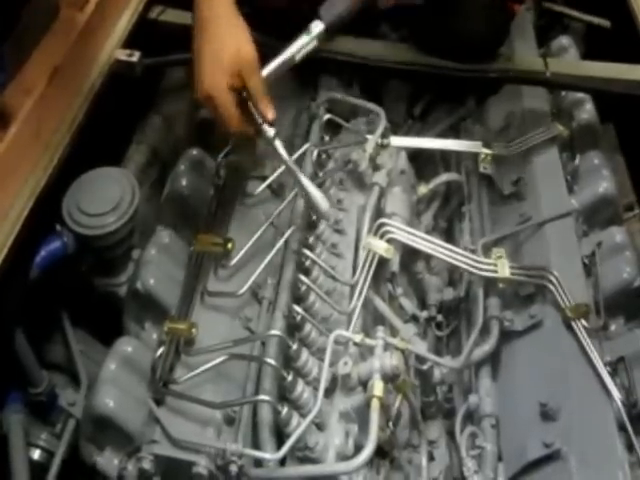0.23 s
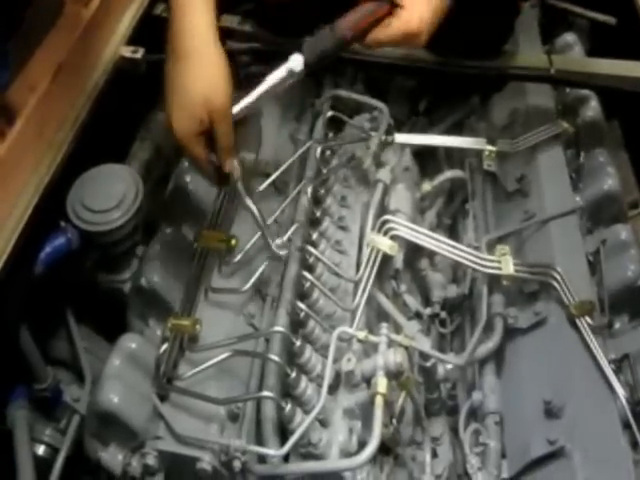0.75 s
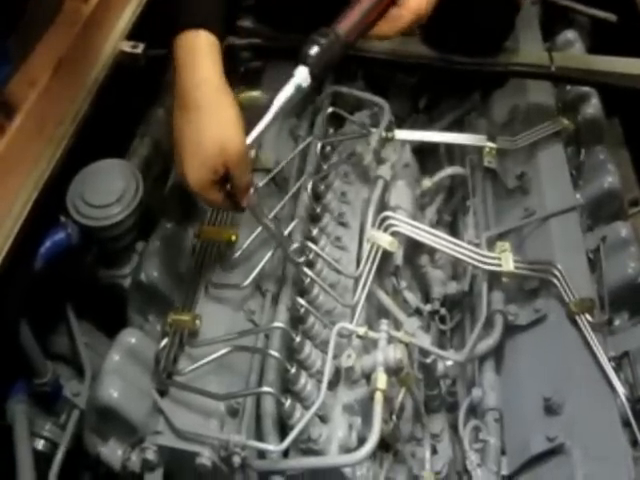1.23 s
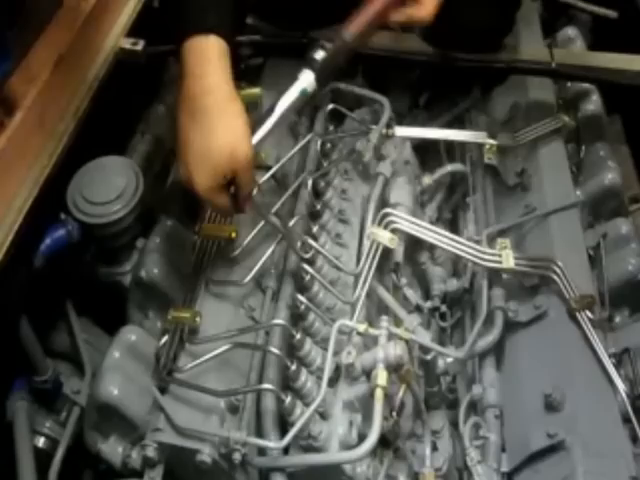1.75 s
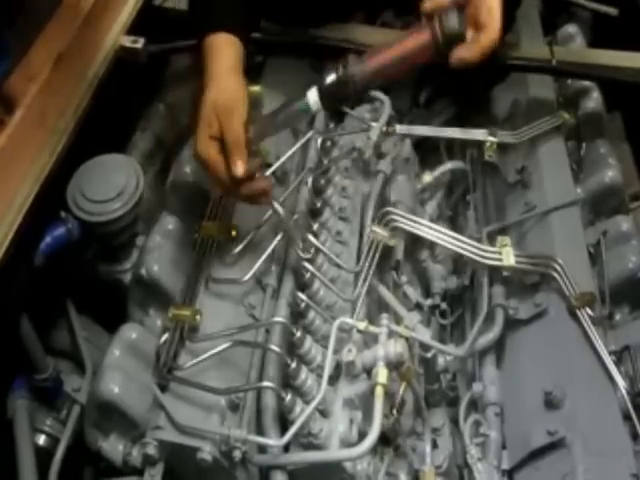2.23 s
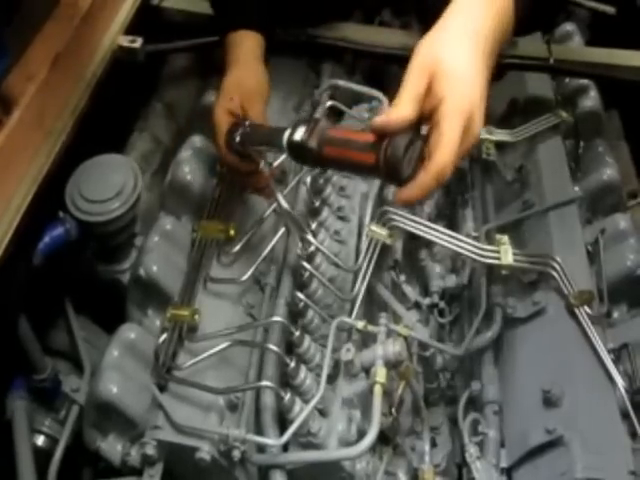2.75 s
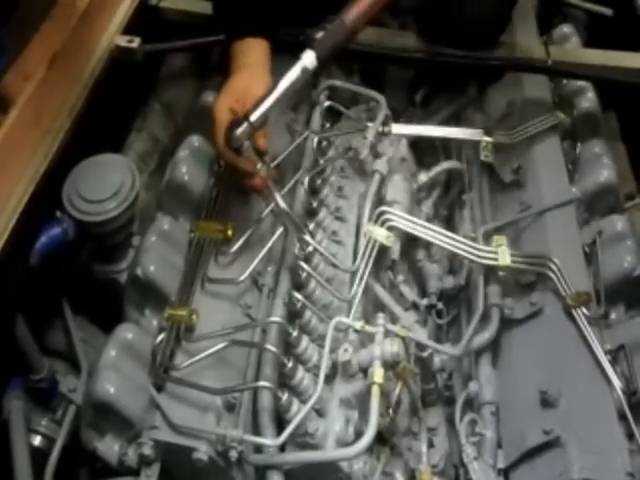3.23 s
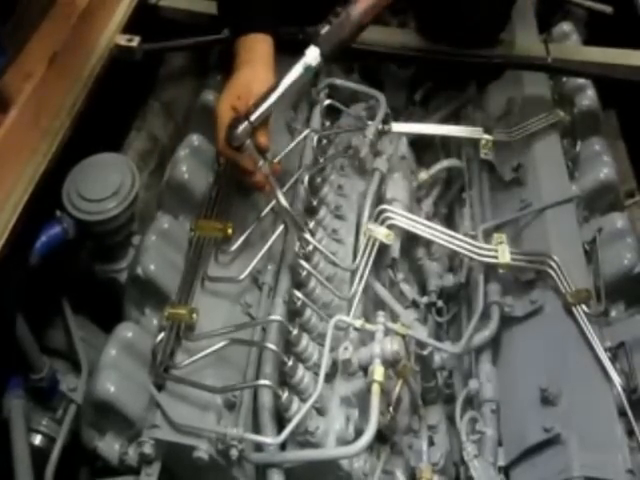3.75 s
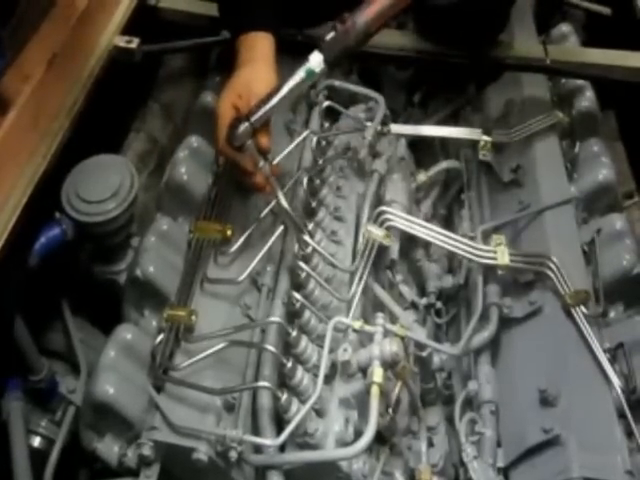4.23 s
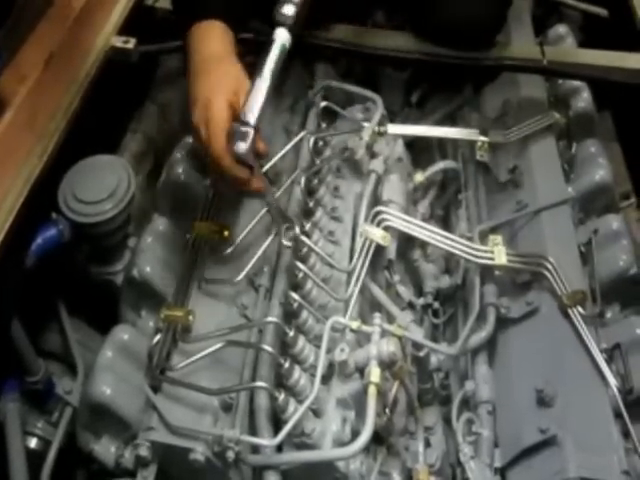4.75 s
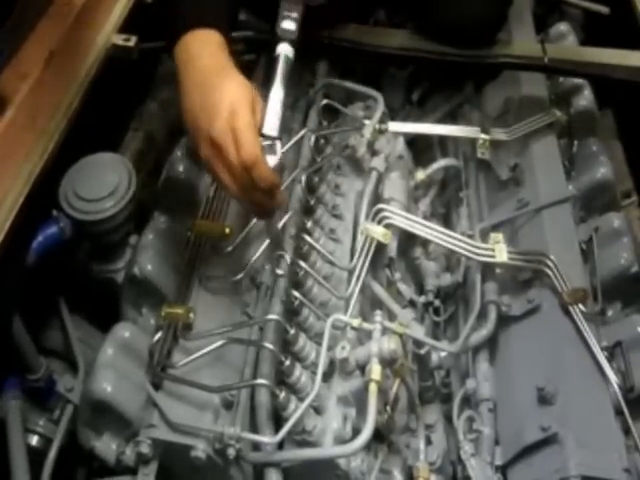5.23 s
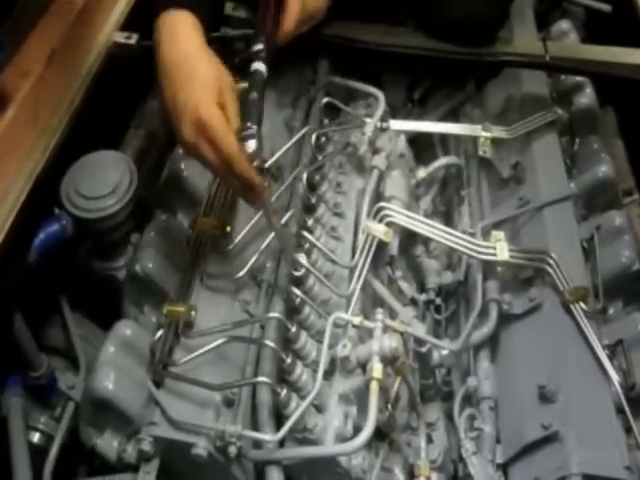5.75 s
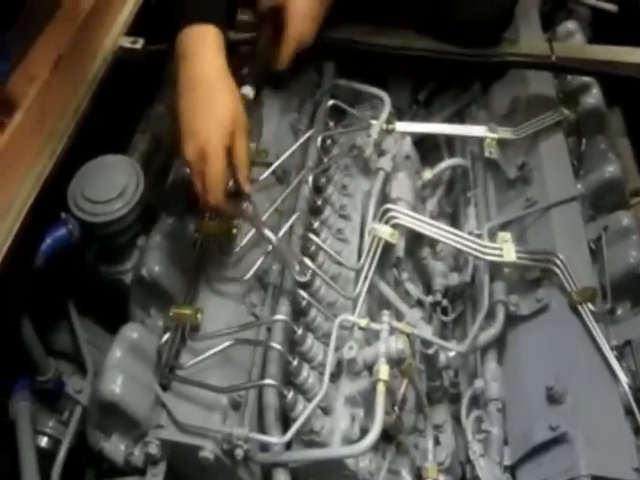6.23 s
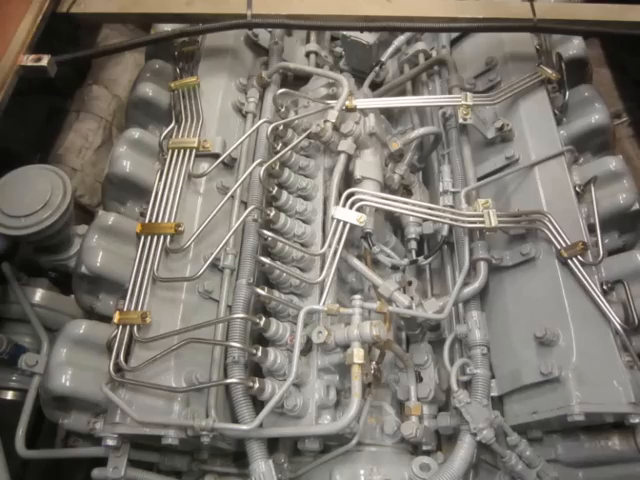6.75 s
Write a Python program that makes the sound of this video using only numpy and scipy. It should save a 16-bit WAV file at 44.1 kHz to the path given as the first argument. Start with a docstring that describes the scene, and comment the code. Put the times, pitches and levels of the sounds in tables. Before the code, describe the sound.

A close, dry workshop with a low wavering machinery hum and faint hiss throughout. After tiny ticks, a ratchet zips at 0.3-0.5 s, about twenty bright metallic clicks speeding up and then braking. Steel knocks follow at 0.8-1.05, and a hard clank with dull pump and pipe ring at 1.5. Around 1.75-1.95 come four slower, softer clicks among knocks and a gritty slide. Mostly hum until 3.0, when a second quick zip of fourteen clicks runs to 3.3, with a scrape and faint thread rub. A soft low drone sinks in pitch towards 4.1. Very hard cracks strike at 4.07 and 4.35, another at 4.5, a lighter one at 4.76; the hum briefly ducks. Small slides and knocks at 4.9-5.5 lead to a clattering cluster at 5.63-5.7. Light ticks and a last knock at 6.06, then abrupt silence from 6.27 to the end.

```python
"""A workshop: a ratcheting torque wrench works on the pipe fittings of a diesel injection pump.
Its pawl zips over the teeth in a quick back-swing, a short slow one and another quick one, each tooth
a burst of noise plus ringing modes. The long steel adapter clanks on nuts and rings, with noise cracks
and decaying modes; the pump and pipes answer dully. Slides, rubs and brushes are shaped noise.
Noise and drones hum underneath; everything ducks after the hardest blows, then stops short."""
import sys
import numpy as np
from scipy import signal
from scipy.fft import rfft, irfft, next_fast_len
from scipy.io import wavfile
from scipy.ndimage import uniform_filter1d

SR = 44100
rng = np.random.default_rng(int(sys.argv[2]) if len(sys.argv) > 2 else 0)


def store_wav(level_fs):
    """Save 16-bit WAV to argv[1]."""
    pcm = np.round(np.clip(np.atleast_2d(level_fs), -1, 1) * 32767)
    wavfile.write(sys.argv[1], SR, pcm.T.astype(np.int16))


N = 308696
TIME = np.arange(N) / SR   # s


def from_db(db):
    """Decibels to gain."""
    return 10 ** (np.asarray(db) / 20)


def rms_one(x):
    """Scale to unit rms."""
    return x / np.sqrt(np.mean(x ** 2) + 1e-20)


def at_hz(points, hz):
    """Read a table on a log-frequency axis."""
    table_hz, value = np.transpose(points)
    return np.interp(np.log(hz + 1), np.log(table_hz), value)


def fade(t, t60):
    """Free decay, 60 dB in t60 seconds."""
    return np.exp(-np.log(1000) * t / t60)


def smooth(x, seconds):
    """One-pole lag."""
    r = np.exp(-1 / (seconds * SR))
    return signal.lfilter([1 - r], [1, -r], x)


def add(out, s, sound):
    """Mix a sound in at time s."""
    i = int(s * SR)
    out[i:i + len(sound)] += sound[:N - i]


def swells(events):
    """Sum of bell-shaped swells: (centre [s], half-width to 1/e [s], level [dB])."""
    return sum(from_db(db) * np.exp(-((TIME - s) / length) ** 2) for s, length, db in events)


def colour(x, *spectra):
    """Causal (minimum-phase) filter whose gain is the sum of the dB spectra."""
    size = 2 * next_fast_len(len(x) // 2 + 2048)
    hz = np.arange(size // 2 + 1) * SR / size
    gain_db = sum(at_hz(spectrum, hz) for spectrum in spectra)
    # folding the cepstrum onto positive time gives minimum phase
    cepstrum = irfft(np.log(from_db(gain_db)))
    cepstrum[1:size // 2] *= 2
    cepstrum[size // 2 + 1:] = 0
    response = np.exp(rfft(cepstrum))
    return irfft(rfft(x, size) * response)[:len(x)]


def narrow_noise(hz, width):
    """Noise held in one narrow resonance; rms 1."""
    b, a = signal.iirpeak(hz, hz / width, fs=SR)
    noise = rng.standard_normal(N + SR)
    resonant = signal.lfilter(b, a, signal.lfilter(b, a, noise))
    return rms_one(resonant[SR:])   # drop the first second, while it builds up


def clatter(t60, linger_db, linger_t60, strike_db=-3, strike_t60=0.0075):
    """Countless crowded steel modes: a sharp strike, a crack that dies fast, then a weak lingering ring."""
    t = TIME[:SR // 4]
    grain = rng.standard_normal(len(t))
    grain /= np.sqrt(uniform_filter1d(grain ** 2, size=32))   # even out the short-term level
    strike = from_db(strike_db) * fade(t, strike_t60)
    linger = from_db(linger_db) * fade(t, linger_t60)
    return grain * (strike + fade(t, t60) + linger)


def ring(modes, spread_db):
    """One blow on a set of decaying modes, each struck with a strength and sign of its own."""
    t = TIME[:SR // 3]
    hz, db, t60 = np.transpose(modes)[:, :, None]
    strength = from_db(db + spread_db * rng.standard_normal(hz.shape)) * rng.choice([-1, 1], hz.shape)
    return np.sum(strength * np.sin(2 * np.pi * hz * t) * fade(t, t60), axis=0)


# colour of the pawl's snap on a tooth: (frequency [Hz], level [dB])
PAWL_COLOUR = [(300, -26.5), (800, -17.5), (1400, -11.5), (2200, -7), (3200, -4), (4300, 0), (5800, 0.5),
               (7000, -2.5), (8400, -1.5), (9800, -5), (11500, -5), (12500, -13)]
# modes of the wrench: (frequency [Hz], relative level [dB], t60 [s])
RATCHET_HEAD = [(4550, -20, .045), (4850, -29.5, .045), (5500, -14, .045), (5500, -16, 0.049),
                (6250, -12, .045), (5830, -26, .045)]
WRENCH_SHAFT = [(2026, -33, 0.04), (2260, -26.5, 0.065), (3980, -26, 0.045), (8360, -47.5, 0.016)]
TOOTH_COLOUR_DB = 2.5   # no two teeth sound quite alike


def ratchet(snap_db=-4.0, head_db=-1.0, shaft_db=-1):
    """The sprung pawl lands on each next tooth and rings the head and shaft of the wrench."""
    snaps, rings = np.zeros((2, N))
    for s, db, treble_db, head_ring_db, shaft_ring_db in teeth():
        snap = clatter(t60=0.038, linger_db=-22.5, linger_t60=.09, strike_db=-1.5, strike_t60=0.009)
        tooth = [(hz, TOOTH_COLOUR_DB * rng.standard_normal()) for hz, _ in PAWL_COLOUR]
        treble = [(5500, 0), (8500, treble_db)]
        add(snaps, s, from_db(db + snap_db) * colour(snap, PAWL_COLOUR, tooth, treble))
        add(rings, s, from_db(db + head_db + head_ring_db) * ring(RATCHET_HEAD, spread_db=2.0))
        add(rings, s, from_db(db + shaft_db + shaft_ring_db) * ring(WRENCH_SHAFT, spread_db=7.0))
    return workshop(snaps, wet_db=-13.0, build_s=0.0071) + rings


# back-swings of the wrench: (start [s], teeth passed [count], rate at the start [teeth/s],
# rate before braking [teeth/s], rate at the end [teeth/s], relative level [dB], treble [dB],
# head ring [dB], shaft ring [dB])
SWINGS = [(0.3131, 20, 77.3, 135.5, 36.3, -4.6, -1, 0.5, -1), (1.8029, 4, 35.7, 33.3, 24.4, -9, -4, -5, -2),
          (3.0276, 14, 46.7, 77.4, 35.0, -3, 0, -9, -2)]
BRAKING_AT = 0.78   # share of a swing after which the hand slows
LOUDER_DB_PER_DOUBLING, BRIGHTER_DB_PER_DOUBLING = 2.3, 4.5   # a faster pawl lands harder
SPRING_ONLY_DOUBLINGS = -0.77   # below this speed (against the swing's mean) the spring alone sets the blow
HEAD_SWELL_DB, SHAFT_RISE_DB = 9, 6   # the head rings most in mid-swing, the shaft towards the end
PRESS_DB = 1   # the hand bears down more towards the end of a swing
TOOTH_SPREAD_DB = 1.6   # random spread of the blows


def teeth():
    """The hand's speed times each drop of the pawl: (s, dB, treble dB, head dB, shaft dB)."""
    for start, count, first, before_braking, last, db, treble_db, head_db, shaft_db in SWINGS:
        along = np.linspace(0, 1, int(round(count)) - 1)
        rate = np.interp(along, [0, BRAKING_AT, 1], [first, before_braking, last])
        times = start + np.r_[0, np.cumsum(1 / rate)]
        doublings = np.log2(np.r_[rate[0], rate] / rate.mean())
        doublings = np.maximum(doublings, SPRING_ONLY_DOUBLINGS)
        along = np.r_[0, along]
        strength_db = db + LOUDER_DB_PER_DOUBLING * doublings + PRESS_DB * (along - .5)
        strength_db += TOOTH_SPREAD_DB * rng.standard_normal(len(times))
        brightness_db = treble_db + BRIGHTER_DB_PER_DOUBLING * doublings
        head_ring_db = head_db + HEAD_SWELL_DB * (np.sin(np.pi * along) ** 2 - .5)
        shaft_ring_db = shaft_db + SHAFT_RISE_DB * (along - .5)
        yield from zip(times, strength_db, brightness_db, head_ring_db, shaft_ring_db)


# steel knocking on steel: (time [s], relative level [dB], low range [dB], top range [dB], crack t60 [s],
# adapter ring [dB], main resonance [Hz], pump body and pipes [dB])
KNOCKS = [(0.8133, -1, 3.5, 0, 0.092, -14, 7000, -4), (0.932, -12, -3, -4, 0.1, -14, 3360, 0.5),
          (0.9584, -10.5, 6.5, -17, 0.12, -36, 2070, -4), (1.0329, 4, -16.5, -10.5, 0.047, -38, 5800, -8.5),
          (1.5153, -7, 3, -13.5, 0.16, -24, 1940, 7.5), (1.5274, 10, -5, -8.5, 0.043, -25.5, 5550, -10),
          (1.5438, -1, 6, -15.5, 0.068, -23, 3840, 5), (1.5765, -4.5, 3, -10, 0.039, -29, 3920, 3.5),
          (1.7552, -2.5, -2.5, 0.5, 0.05, -17.5, 3830, 9), (1.7616, -7, 6.5, -14, 0.059, -36, 1740, -4),
          (1.9389, -7, -20, -1.5, 0.028, -43, 3600, -1.5),
          (1.9451, -2.5, -4.5, -14.5, 0.064, -41, 3170, 0.5), (2.992, -6.5, -13, -48, 0.025, -49, 1920, -3),
          (3.092, -3, -4.5, -15, 0.046, -39, 2940, -11), (3.3388, -9.5, -15.5, 1, 0.083, -44, 5300, -15),
          (3.3473, -2, 0, -0.5, 0.038, -54, 5700, -17), (4.0744, 12, -7.5, 4.5, 0.042, -38, 1070, -21),
          (4.081, -2.5, -10, -5, 0.16, -39, 5600, -14), (4.348, 8.5, 2, 6, 0.038, -36, 1425, -11),
          (4.5247, 3, 2, -4.5, 0.04, -21, 1657, 4), (4.538, -12.5, 2, -16.5, 0.073, -27, 1800, 12),
          (4.761, -6, -10, -6, 0.097, -26, 3760, 7.5), (5.2037, 0.5, -0.5, -8, 0.05, -24, 3610, -0.5),
          (5.2992, -13, 6.5, -3, 0.15, -33, 890, -2.5), (5.4605, -8, 0, -4, 0.095, -15, 1750, 9),
          (5.4868, -8.5, 12, -7, 0.039, -30, 3560, -0.5), (5.6263, -11, 3, -14.5, 0.11, -29.5, 3570, 6),
          (5.634, -12, 3.5, -19.5, 0.12, -21.5, 3140, 7.5),
          (5.6544, 6.5, -4.5, -10.5, 0.05, -19.5, 7370, -0.5),
          (5.664, 2, -4.5, -1.5, 0.025, -32.5, 7500, -5.5), (5.6882, -1.5, 1.5, -7, 0.038, -26, 1032, 3.5),
          (6.0614, -1.5, -8, -14, 0.034, -50, 4570, -11.5)]
# centres of the low, middle, reference and top ranges: (frequency [Hz])
RANGE_HZ = [600, 1900, 4400, 9000]
# colour shared by the knocks: (frequency [Hz], level [dB])
KNOCK_COLOUR = [(120, -19.5), (250, -14), (400, -4.5), (800, -10.5), (1400, -4), (3000, 0), (5500, -2),
                (8000, -3.5), (9500, -6.5), (11500, -8.5), (12500, -7)]
# modes of the long steel adapter and the pipes: (frequency [Hz], relative level [dB], t60 [s])
ADAPTER = [(1830, -18, 0.079), (2880, 1, 0.055), (3473, -17.5, 0.073), (7390, 2.5, 0.052),
           (8260, 6.5, 0.049), (11200, -13.5, .1)]
PIPES = [(408.8, -28, 0.27), (566, -30.5, 0.32), (1030, -43, 0.086), (1100, -35.5, 0.083), (1720, -42, .12),
         (2320, -29.5, 0.097)]
MIDDLE_DB, MIDDLE_FOLLOWS = -1.97, 0.15   # the middle range takes this share of a knock's low range


def knocks(crack_db=-2, body_db=-11.0, pipes_db=-2, main_db=-12.0, main_t60=0.039):
    """Where the steel meets sets each knock's colour and main resonance; adapter and pipes ring on."""
    cracks, rings = np.zeros((2, N))
    for s, db, low_db, top_db, t60, ring_db, hz, pump_db in KNOCKS:
        middle_db = MIDDLE_DB + MIDDLE_FOLLOWS * low_db
        ranges = list(zip(RANGE_HZ, (low_db, middle_db, 0, top_db)))
        crack = clatter(t60, linger_db=-37.0, linger_t60=0.2)
        add(cracks, s, from_db(db + crack_db) * colour(crack, KNOCK_COLOUR, ranges))
        add(rings, s, from_db(db) * ring([(hz, main_db, main_t60)], spread_db=6.0))
        add(rings, s, from_db(db + ring_db) * ring(ADAPTER, spread_db=2.7))
        # the blow shakes the pump and its pipes
        add(rings, s, from_db(db + pump_db + body_db) * body())
        add(rings, s, from_db(db + pump_db + pipes_db) * ring(PIPES, spread_db=2.0))
    return workshop(cracks, wet_db=-16.0, build_s=0.0017) + rings


# dull body of the pump under a knock: (frequency [Hz], level [dB])
BODY_COLOUR = [(200, -24.5), (380, -7.5), (600, 0.5), (850, 1), (1200, 1.5), (1800, 4.5), (3000, -11),
               (6000, -32.5)]


def body(t60=0.11, build_s=0.009):
    """The heavy pump takes a moment to answer a blow, and rings dully."""
    t = TIME[:SR // 4]
    answer = fade(t, t60) * (1 - np.exp(-t / build_s))
    return colour(rng.standard_normal(len(t)) * answer, BODY_COLOUR)


# light touches of the tool: (time [s], relative level [dB])
TOUCHES = [(0.040, -25), (0.284, -21), (1.467, -24.5), (1.632, -24), (2.056, -23.5), (2.936, -23),
           (4.46, -23), (4.713, -20.5), (5.446, -16.5), (5.815, -23.5), (5.904, -29), (6.047, -26),
           (6.218, -24.5)]
# steel sliding on steel: (centre [s], half-width to 1/e [s], relative level [dB])
SLIDES = [(1.4, 0.13, -41.5), (1.908, 0.08, -38.5), (2.31, 0.035, -47), (3.267, 0.14, -33.5),
          (4.447, 0.074, -38), (4.89, 0.12, -46), (4.997, 0.015, -34), (5.308, 0.03, -36),
          (5.39, 0.04, -38.5), (5.568, 0.097, -43.5)]
# resonances of the tool that a slide sets singing: (frequency [Hz], width [Hz], relative level [dB])
SLIDE_RINGS = [(1813, 90, -15), (2250, 80, -19), (3814, 110, -19), (4300, 120, -20.5)]


def handling(touch_db=-7, grain_db=6.0):
    """Light ticks and short gritty slides as the tool is seated."""
    grain = from_db(grain_db * rng.standard_normal(N))   # uneven noise peaks make the grit
    grit = rms_one(rng.standard_normal(N) * grain)
    grit += sum(from_db(db) * narrow_noise(hz, width) for hz, width, db in SLIDE_RINGS)
    out = grit * swells(SLIDES)
    for s, db in TOUCHES:
        add(out, s, from_db(db + touch_db) * clatter(t60=0.037, linger_db=-21.5, linger_t60=.1))
    return colour(out, [(200, -7), (1200, 4.5), (3800, 4), (7000, -4.5), (12000, -16.5)])


# the nut turning under load: (time [s], level [dB])
TURNING = [(3.2, -56), (3.28, -35.5), (3.42, -49), (3.6, -58), (3.88, -52), (4.05, -54), (4.08, -67)]
# resonances of its rub: (frequency [Hz], width [Hz], relative level [dB])
RUB = [(480, 57, 1.5), (2430, 200, 0), (3680, 120, -5.5)]


def turning_nut():
    """Threads rub faintly while the wrench pulls: noise in a few narrow resonances."""
    s, db = np.transpose(TURNING)
    rub = rms_one(sum(from_db(level) * narrow_noise(hz, width) for hz, width, level in RUB))
    return rub * np.interp(TIME, s, from_db(db), left=0, right=0)


# faint bright brushing as the hand shifts its grip: (centre [s], half-width to 1/e [s], level [dB])
BRUSHES = [(0.202, 0.04, -54), (1.37, 0.068, -50), (2.29, 0.04, -49), (2.42, 0.06, -52)]
# colour of the brushing: (frequency [Hz], relative level [dB])
BRUSH_COLOUR = [(3000, -20.5), (7000, 0), (9500, -1), (12500, -5.5)]


def brushing():
    """Skin brushes over steel: swells of bright noise."""
    return swells(BRUSHES) * rms_one(colour(rng.standard_normal(N), BRUSH_COLOUR))


# level of the background: (time [s], hum level [dB], relative hiss level [dB])
BACKGROUND = [(0, -40, -45.5), (0.65, -38.5, -44.5), (1.1, -37, -42.5), (2.1, -38, -42), (2.65, -34.5, -41),
              (3.6, -37.5, -43), (4.5, -34.5, -41), (4.9, -38, -43), (5.35, -34.5, -40), (5.8, -40, -44.5),
              (6.27, -37, -41)]
# colours of the rumble and the hiss: (frequency [Hz], relative level [dB])
HUM = [(11, -34), (18, -1.5), (54, -1.5), (81, -3), (113, -4.5), (171, -5.5), (205, -1.5), (233, -6),
       (249, 1.5), (275, -9.5), (307, -1.5), (441, -22.5), (500, -9.5), (650, -55), (1100, -120)]
HISS = [(240, -21), (400, 0), (556, -7), (598, -1.5), (752, -6), (1750, -9), (2300, -12), (2810, -12.5),
        (8860, -24.5), (12300, -30), (16000, -54), (22000, -120)]
# narrow drones within the hum: (frequency [Hz], width [Hz], relative level [dB])
DRONES = [(38.8, 2.7, -12.5), (99.6, 1.7, -15), (120.2, 19, -13), (197.3, 3.3, -12), (221.35, 5.7, -7.5),
          (243.4, 18, -9)]


def background(rumble_db=0.0, drone_db=1, air_db=1.0):
    """Distant machinery: rumble, narrow wavering drones and a soft hiss, all from filtered noise."""
    s, *levels = np.transpose(BACKGROUND)
    hum_db, hiss_db = [np.interp(TIME, s, level) for level in levels]
    hum = from_db(rumble_db) * rms_one(colour(rng.standard_normal(N), HUM))
    hum += sum(from_db(db + drone_db) * narrow_noise(hz, width) for hz, width, db in DRONES)
    hiss = rms_one(colour(rng.standard_normal(N), HISS))
    return from_db(hum_db) * hum + from_db(hiss_db + air_db) * hiss


# low sinking drone: (time [s], frequency [Hz], rms level [dB])
SINKING = [(3.3, 70, -66.5), (3.55, 65.3, -49), (3.8, 58, -47), (4.03, 54.7, -37), (4.12, 54, -58.5)]


def sinking_drone():
    """A low sine swells and fades while it sinks in pitch."""
    s, hz, db = np.transpose(SINKING)
    phase = 2 * np.pi * np.cumsum(np.interp(TIME, s, hz)) / SR
    return np.sqrt(2) * np.sin(phase) * np.interp(TIME, s, from_db(db), left=0, right=0)


# decay of the room: (frequency [Hz], t60 [s])
ROOM_T60 = [(300, 0.29), (800, 0.39), (2000, 0.17), (5500, 0.17), (12000, 0.11)]


def workshop(x, wet_db, build_s):
    """Diffuse reflections build up, then die away at a rate set for each band."""
    t, response = TIME[:SR // 2], 0
    edges = np.geomspace(150, 15000, 9)   # band edges, Hz
    for low, high in zip(edges, edges[1:]):
        band_pass = signal.butter(2, [low, high], "band", fs=SR, output="sos")
        band = signal.sosfilt(band_pass, rng.standard_normal(len(t)))
        response = response + band * fade(t, at_hz(ROOM_T60, np.sqrt(low * high)))
    response = response * (1 - np.exp(-t / build_s))
    response /= np.linalg.norm(response)
    return x + from_db(wet_db) * signal.fftconvolve(x, response)[:N]


GAIN_THRESHOLD_DB, GAIN_ATTACK_S, GAIN_RECOVERY_DB_PER_S = -8, 0.002, 11


def gain_control(x, window_s=0.013):
    """A loud blow pushes the gain down within milliseconds; it creeps back at a steady rate."""
    level_db = 10 * np.log10(smooth(x ** 2, window_s) + 1e-12)
    over_db = np.maximum(level_db - GAIN_THRESHOLD_DB, 0)
    # a running peak along a sloping line holds each reduction and releases it steadily
    recovered_db = GAIN_RECOVERY_DB_PER_S * TIME
    held_db = np.maximum.accumulate(over_db + recovered_db, axis=-1) - recovered_db
    return x * from_db(-smooth(held_db, GAIN_ATTACK_S))


def scene():
    """Tool sounds in the room, over the hum."""
    tools = ratchet() + knocks() + turning_nut() + workshop(handling(), wet_db=-10.5, build_s=0.0064)
    return (tools + background() + sinking_drone() + brushing())[None]


STOP_S, CUTOFF_HZ = 6.274, 12500


def record(dry, top=0.89):
    """The hardest hits duck the gain and overload, the sound stops short, the top is cut."""
    running = np.clip((STOP_S - TIME) / .005, 0, 1)   # 5 ms fade to silence
    clipped = np.clip(gain_control(dry), -top, top) * running
    low_pass = signal.ellip(10, .2, 70, CUTOFF_HZ, fs=SR, output="sos")
    return signal.sosfilt(low_pass, clipped)


dry = scene()
out = record(dry)
store_wav(out)
```